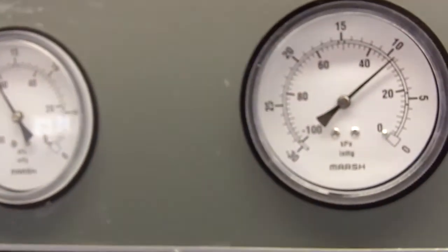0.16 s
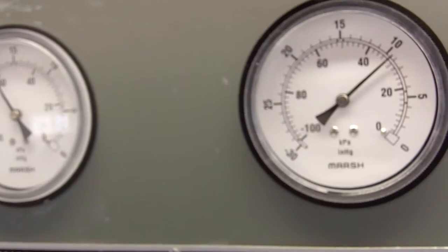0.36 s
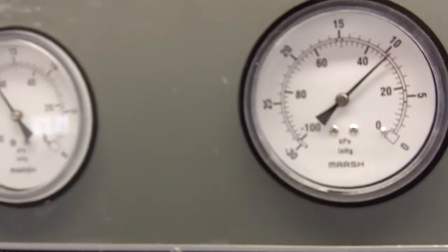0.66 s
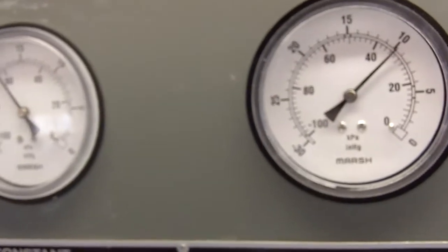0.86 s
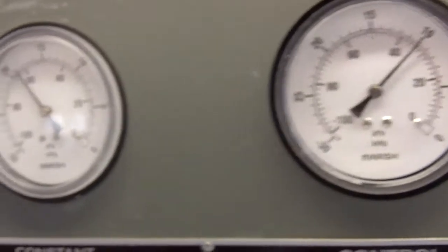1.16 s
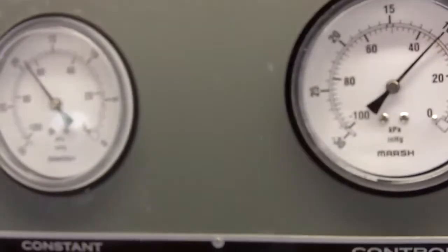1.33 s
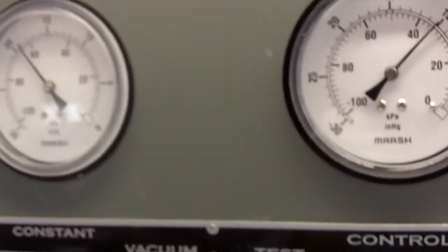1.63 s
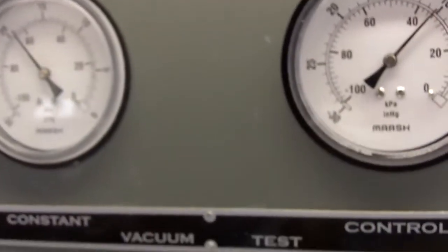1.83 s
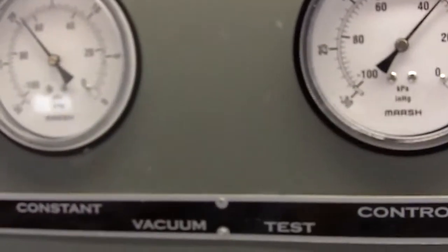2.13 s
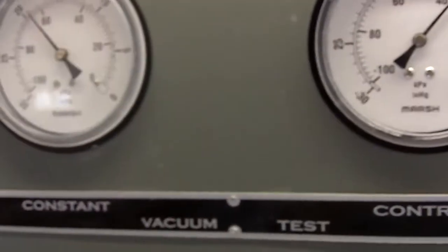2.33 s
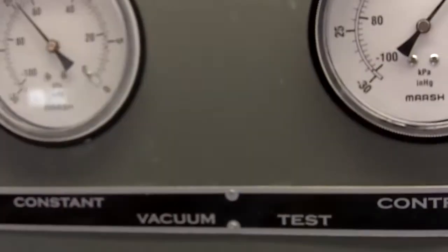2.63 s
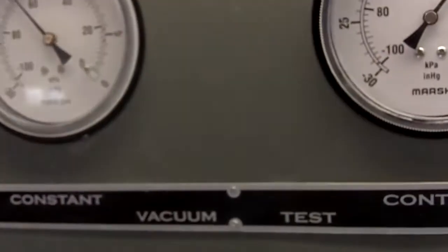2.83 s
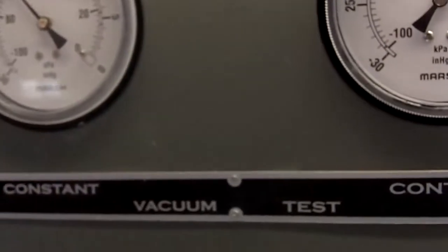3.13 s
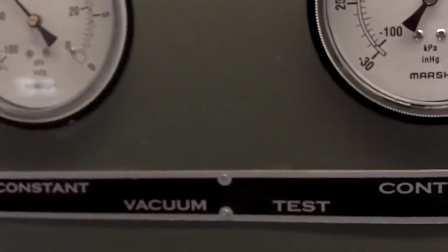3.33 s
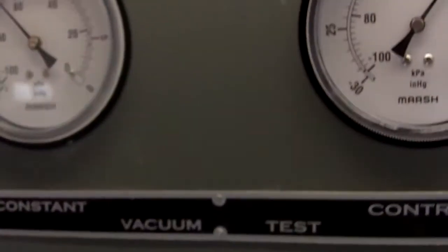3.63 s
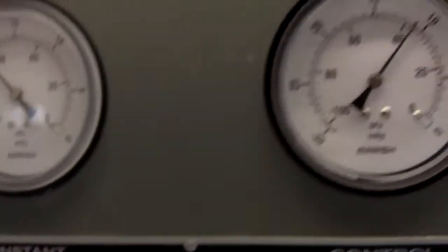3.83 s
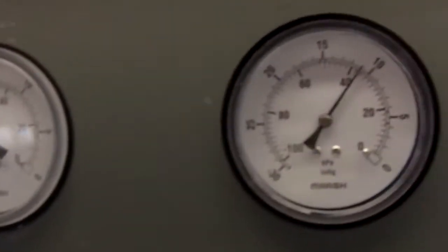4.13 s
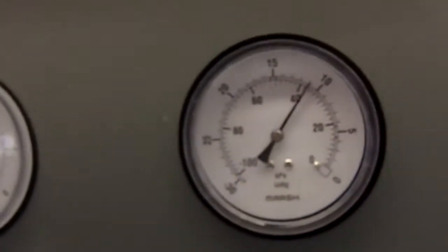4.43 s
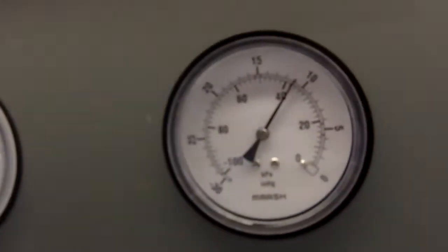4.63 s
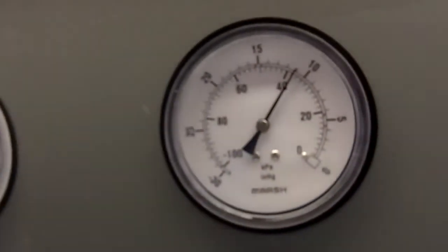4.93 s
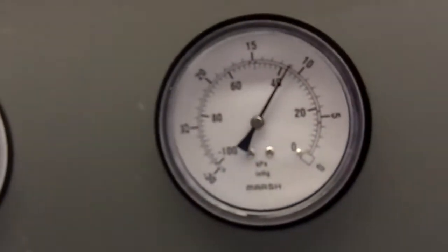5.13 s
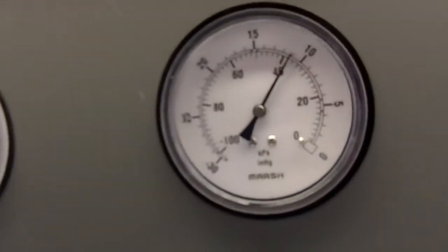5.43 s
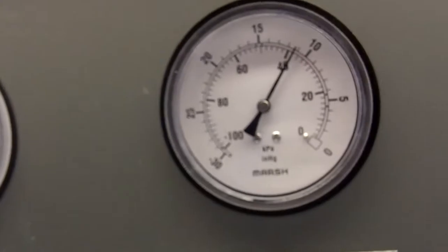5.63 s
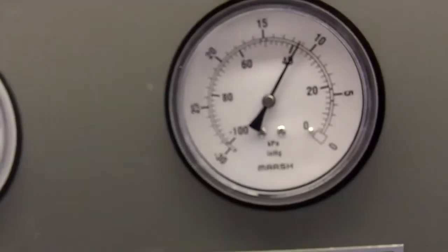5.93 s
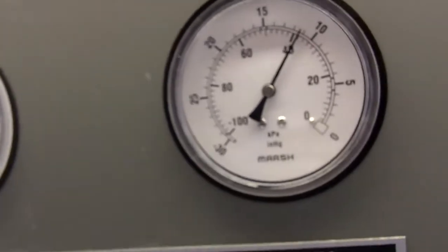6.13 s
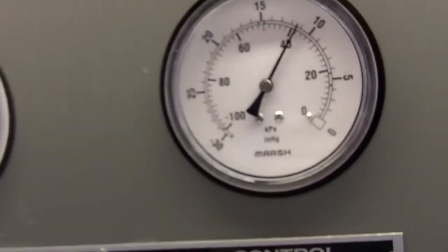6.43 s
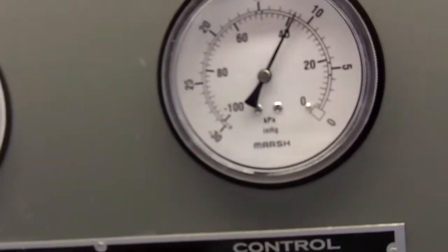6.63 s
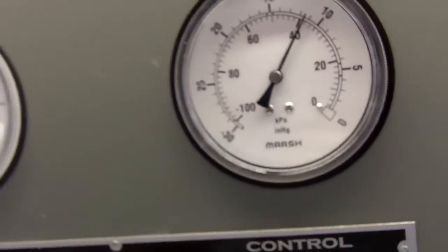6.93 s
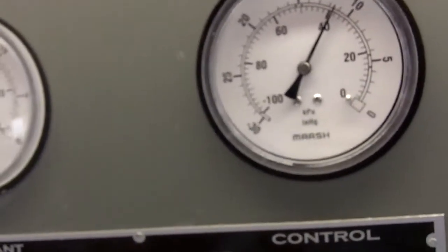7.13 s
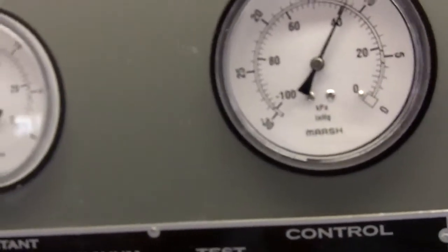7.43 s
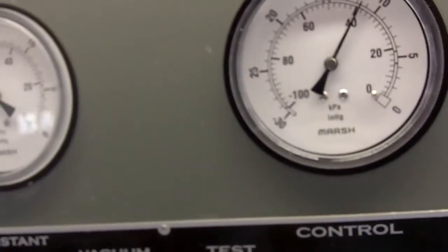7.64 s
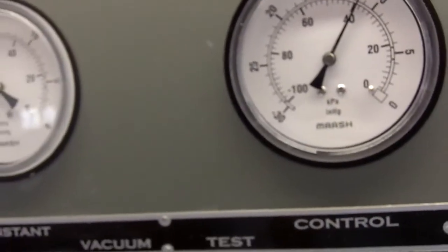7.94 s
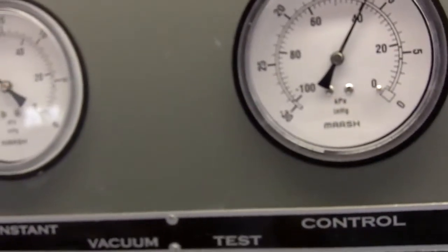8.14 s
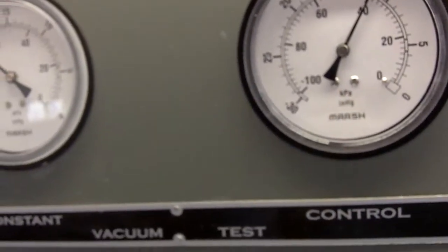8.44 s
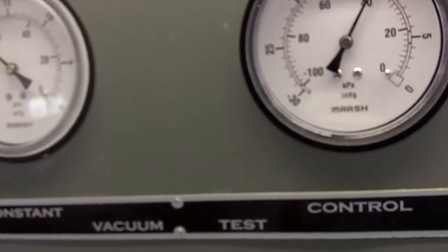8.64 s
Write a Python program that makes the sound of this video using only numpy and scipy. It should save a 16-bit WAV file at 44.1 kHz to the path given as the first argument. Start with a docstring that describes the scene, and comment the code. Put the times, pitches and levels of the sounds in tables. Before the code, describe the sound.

Steady low motor drone and a rapid chugging flutter of about twenty turns a second, boxed in by sheet steel. The pump hunts a little in speed, so its throb rises and falls. After a brief soft brush against the bench, small dry clicks, jarring ticks and muffled knocks become more frequent. Close microphone in a workshop, mono-like, bass heavy with little treble, no start or stop.

```python
"""Under a steel test bench, heard from close to the gauge panel: a belt-driven vacuum pump.
The motor hums at twice the mains frequency; the pump shaft hunts in speed, and its orders throb.
Noise bunched within each turn rings the sheet-steel cabinet: knock, clatter, rattle, valve slaps.
These grow with speed and vacuum. Noise bursts make ticks of a loose fitting, thuds and dry clicks;
short swells of noise make soft scuffs."""
import sys
import numpy as np
from scipy import signal
from scipy.fft import rfft, irfft, next_fast_len
from scipy.io import wavfile
from scipy.ndimage import map_coordinates

SR = 44100
rng = np.random.default_rng(int(sys.argv[2]) if len(sys.argv) > 2 else 0)


def log_audio(samples):
    """Write samples as a 16-bit WAV file to the path given in sys.argv[1]."""
    # one column per channel
    frames = np.atleast_2d(samples).T
    # limit to full scale, then quantise
    limited = np.clip(frames, -1, 1)
    pcm = np.round(limited * 32767).astype(np.int16)
    wavfile.write(sys.argv[1], SR, pcm)


N = 386757

# microphone response, notched in the treble: f/Hz, level/dB
MIC_RESPONSE = [(4700, -0.5), (5600, -13), (6600, -2)]
TOP_HZ = 15100
# microphone hiss: f/Hz, level/dB per Hz
HISS_COLOUR = [(3000, -9), (5600, -5.5), (7000, 0), (8000, 0), (10000, -0.5), (13400, -2), (14200, -20)]

# soft scuffs: t/s, length/s, level/dB
SCUFF_EVENTS = [(2.495, 0.028, -36.5), (2.529, 0.014, -35)]
# scuff noise: f/Hz, level/dB per Hz
SCUFF_COLOUR = [(400, -15), (850, 5.5), (1400, 1.5), (1650, -4.5), (1820, 0), (2050, -19), (2500, -27),
                (3200, -37), (4400, -50), (8500, -52), (13000, -61)]
# light rustling touches, the scuff's first contact among them: t/s, length/s, level/dB
TOUCH_EVENTS = [(1.87, .005, -66), (2.495, 0.0074, -62.5), (2.828, .008, -68), (2.937, .004, -70),
                (3.005, .005, -69), (3.098, 0.0046, -67.5), (3.26, 0.01, -69.5), (6.456, 0.0045, -70),
                (7.736, 0.0054, -68.5), (8.134, .004, -66)]
# touch noise: f/Hz, level/dB per Hz
TOUCH_COLOUR = [(2000, -2.5), (3200, 2), (4100, -0.5), (5000, -7.5), (6000, -14.5), (8500, -17.5),
                (12000, -28.5)]

# ticks of the loose fitting, before lifts: t/s, tick level/dB, level/dB of the heavy stroke that jars the
# cabinet with it
TICK_EVENTS = [(2.9982, -56, -50.5), (4.0103, -59.5, -50), (4.2921, -52.5, -42), (4.4817, -54, -50),
               (4.5602, -60.5, -57), (5.248, -52, -47), (5.342, -45, -38.5), (5.437, -56, -52),
               (5.5194, -59.5, -55), (5.627, -48.5, -46.5), (5.768, -53.5, -51), (6.5341, -56, -50.5),
               (6.63, -54, -49), (6.7266, -54.5, -49), (6.8794, -60, -49.5), (7.0394, -61, -57),
               (7.1521, -48, -40.5), (7.233, -54.5, -50), (7.9189, -50.5, -38), (8.2042, -56, -47.5),
               (8.2811, -59, -54.5), (8.3442, -52, -42), (8.4385, -53.5, -49), (8.5349, -51, -43.5),
               (8.6146, -52.5, -45), (8.6292, -55.5, -50)]
# tick: f/Hz, level/dB per Hz
TICK_COLOUR = [(500, -4), (1500, 8.5), (3000, -3.5), (4500, -8), (6000, -4.5), (7200, -2.5), (8200, -0.5),
               (10000, -8), (12000, -13), (15000, -24.5)]
# cabinet jarred by a heavy pump stroke that lands with a tick: f/Hz, level/dB per Hz
JAR_COLOUR = [(250, -8.5), (450, -2.5), (620, 8.5), (850, 15.5), (1500, 3), (2200, -10), (3200, -20.5),
              (4500, -33), (7000, -48)]
# heavy pump strokes, before lift: t/s, level/dB
THUD_EVENTS = [(1.36, -45), (1.41, -42), (1.46, -45), (1.951, -43), (2.948, -42), (3.114, -39), (3.14, -39),
               (3.16, -41.5), (3.569, -43.5), (3.931, -39.5), (3.975, -41), (4.266, -42.5), (4.84, -43),
               (5.058, -40.5), (5.252, -39), (5.628, -40), (6.125, -40.5), (6.181, -41.5), (6.379, -41),
               (6.602, -38.5), (6.724, -42), (6.912, -42.5), (7.268, -40.5), (7.412, -40), (7.46, -41),
               (7.659, -41.5), (7.725, -43), (7.744, -39), (8.206, -40)]
# dull thud of a heavy stroke: f/Hz, level/dB per Hz
THUD_COLOUR = [(250, -10), (450, 2.5), (620, 9.5), (850, 7.5), (1500, -6.5), (2200, -21), (4000, -49.5)]
# clearest dry clicks, before lift: t/s, level/dB
CLICK_EVENTS = [(1.5654, -55), (2.826, -54), (2.9153, -56), (3.041, -57.5), (5.1547, -59), (6.6907, -56),
                (7.7513, -59), (7.8392, -57.5), (7.8939, -56), (8.1332, -55.5), (8.1728, -56.5),
                (8.2257, -58.5), (8.5599, -57.5)]
# dry click: f/Hz, level/dB per Hz
CLICK_COLOUR = [(1000, -8.5), (4000, -3), (6500, 2), (10000, 2), (14000, -4)]
TICK_LIFT_DB, JAR_LIFT_DB, THUD_LIFT_DB, CLICK_LIFT_DB = 6.0, 13.5, 25, 10.5
# chance clicks: rate at full vacuum, level before lift
CLICKS_PER_S, CHANCE_CLICK_DB, CLICK_SCATTER_DB = 5.4, -62.5, 3.2

# low tone near the hum overtones that swells and fades about once a second
SWELL_HZ, SWELL_DB, SWELL_SWING_DB = 0.98 * 220.4, -40.5, 4.5
SWELL_PERIOD_S, SWELL_PEAK_S = 1.045, 0.93  # period, time of first peak

# sheet-steel cabinet resonances: f/Hz, width/Hz, lift/dB
CABINET_MODES = [(50.7, 5.6, 13), (101, 17, 7.5), (146, 4.9, -0.5), (178, 30, 3.5), (223, 22, 3.5),
                 (284.6, 24, 7), (353, 120, 3), (399, 14, 2), (577.4, 12, 6.5), (639, 60, 7), (760, 49, 3),
                 (853, 24, 6.5), (956, 37, 9.5), (1110.5, 61, 10), (1224, 260, 3), (1450, 18, 6),
                 (1720, 60, 1.5), (2950, 160, 4.5)]
# valve plate flutter: t/s, level/dB
FLUTTER_LEVEL_DB = [(0, -58.5), (2.2, -48.5), (2.8, -45), (3.9, -46), (4.7, -54), (8.77, -50.5)]
# flutter noise: f/Hz, level/dB per Hz
FLUTTER_COLOUR = [(800, -36), (1060, -6.5), (1150, -3), (1230, 3.5), (1290, -8), (1700, -47)]
# valve slaps: delay/turns after the stroke, level/dB
SLAP_TIMING = [(0.02, -0.5), (0.58, -2.5)]
# slap noise: f/Hz, level/dB per Hz
SLAP_COLOUR = [(200, -30.5), (400, -6.5), (520, -1), (690, 2.5), (800, -2.5), (1000, -14.5), (1300, -19),
               (2500, -55)]
SLAP_T60_S, SLAP_SCATTER_DB = 0.16, 3
# mechanism noise: f/Hz, level/dB per Hz
KNOCK_COLOUR = [(10, -24), (25, -3.5), (60, -1.5), (150, 0.5), (250, -3), (320, -5.5), (400, -5), (470, -2),
                (600, -11.5), (1200, -69)]
CLATTER_COLOUR = [(200, -38), (400, -6.5), (520, 0), (690, 0), (800, -2), (1000, -12.5), (1300, -23),
                  (2500, -66.5)]
RATTLE_COLOUR = [(700, -27.5), (1050, -7.5), (1350, 0.5), (1600, -1.5), (1950, -7), (2200, -14.5),
                 (2550, -19.5), (3000, -24.5), (3500, -29.5), (4400, -38.5), (5500, -50.5), (8000, -67)]
# effort laws: level at reference speed and full vacuum/dB, slope/dB per turn/s, vacuum gain/dB
KNOCK_EFFORT = (-29.5, 3.6, 5)
CLATTER_EFFORT = (-33, 2.8, 2.3)
RATTLE_EFFORT = (-43.5, 3.0, 0.89)
SLAP_EFFORT = (-36.3, 2.5, 7)
SURGE_DB, SURGE_KNOTS_PER_S = 0.02, 9  # tiny chance swell shared by the four

# loose panel modes excited by each stroke: f/Hz, width/Hz, level/dB
STROKE_MODES_HZ = [(346.2, 46, 4.5), (400, 55, -1), (587.6, 67, -8.5), (644, 220, -10.5)]
STROKE_DB, STROKE_FADE_DB_PER_S = -39.5, 0.56
STROKE_TURN = 0.72  # place of the stroke, turns from the start

# motor hum: t/s, level/dB
HUM_LEVEL_DB = [(0, -23), (.25, -22.5), (.45, -23.5), (.85, -24.5), (1.2, -22.2), (1.5, -23), (1.9, -23),
                (2.1, -25.5), (2.5, -22.5), (2.9, -24.5), (3.4, -23), (4.35, -24), (4.7, -22.5),
                (5.6, -23.5), (6.2, -22), (7.05, -24), (7.6, -22.5), (8.6, -25)]
# hum overtones: multiple of the hum frequency, level/dB re HUM_LEVEL_DB, chance waver/dB
HUM_PARTIALS = [(1, 1, 0), (1.5, -25, 1.5), (2, -25, 2), (3, -20, 3.5), (5, -32, 1.5)]
# hum modulation by pump load: multiple of shaft speed, depth/dB
LOAD_SWING = [(1, -16.5), (3, -28.5), (5, -33)]
# rotor unbalance: multiple of rotor speed, level/dB
ROTOR_TONES = [(1, -35.5), (3, -46.5)]
MAINS_HZ, ROTOR_HZ = 59.9, 29.6

# pump shaft speed: t/s, speed/turns per s
SHAFT_SPEED = [(0, 20.35), (0.2, 20.3), (0.5, 19.95), (0.85, 20.05), (1.1, 20.3), (1.42, 21.0),
               (1.6, 20.85), (1.9, 20.4), (2.35, 20.17), (2.68, 21.05), (3.05, 20.97), (3.42, 20.43),
               (3.87, 21.1), (4.3, 21.06), (4.62, 20.76), (5.1, 21.08), (5.58, 21.13), (5.95, 20.8),
               (6.4, 20.92), (6.68, 21.14), (7.2, 20.9), (7.6, 20.88), (8.1, 21.1), (8.77, 20.95)]
REFERENCE_TURNS_PER_S = 21
VACUUM_TIME_CONSTANT_S = 3.0
# pump tones: multiple of shaft speed, start level/dB, full-vacuum level/dB
PUMP_TONES = [(1.01, -49.5, -48), (2, -38, -36.5), (3.97, -47, -46), (4.987, -38.5, -41), (7, -39.5, -52.5),
              (9.01, -44.5, -44.5), (11.03, -49, -47.5), (13.05, -48.5, -42.5), (17, -46.5, -42),
              (18.08, -40, -43.5), (19, -42, -40.5), (20, -44.5, -45.5), (20.77, -45, -47.5),
              (28.07, -49, -47.5)]
# throb (third shaft order), before trim and floor: t/s, level/dB
THROB_LEVEL_DB = [(0.0, -43), (0.05, -39.5), (0.54, -24), (1.32, -32), (1.41, -26), (1.59, -19.5),
                  (1.76, -35.5), (2.2, -27), (2.54, -38.5), (2.73, -21.5), (3.22, -21.5), (3.35, -30),
                  (3.62, -30.5), (4.17, -20), (4.47, -21), (4.64, -33), (4.74, -25), (5.71, -22.5),
                  (6.1, -27.5), (6.28, -22.5), (7.13, -21.5), (7.26, -25.5), (7.57, -21), (7.72, -24),
                  (7.85, -21), (8.3, -21.5), (8.7, -21), (8.77, -29)]
THROB_TRIM_DB, THROB_FLOOR_DB = -2.5, -36
# panel that sings when this shaft order meets it, less under vacuum
PANEL_ORDER, PANEL_HZ, PANEL_WIDTH_HZ = 14, 287.5, 7
PANEL_DB, PANEL_FADE_DB = -33.5, 13


def amp(db):
    """Decibels to gain."""
    return 10 ** (np.asarray(db) / 20)


def unit(x):
    """Scale to rms 1."""
    return x / np.sqrt(np.mean(x ** 2) + 1e-20)


def clock():
    """Time of each sample in s."""
    return np.arange(N) / SR


def curves(rows):
    """One value per sample for each column after the time."""
    t, *columns = np.transpose(rows)
    return [np.interp(clock(), t, column) for column in columns]


def wobble(knots_per_s):
    """Smooth random curve through normal random knots."""
    knots = rng.standard_normal(int(N * knots_per_s / SR) + 4)
    return map_coordinates(knots, [clock() * knots_per_s])


def filtered(x, response):
    """x times a response of frequency."""
    size = next_fast_len(N + SR // 2)
    spectrum = rfft(x, size) * response(np.fft.rfftfreq(size, 1 / SR))
    return irfft(spectrum, size)[..., :N]


def colour(points, hz):
    """Gain of (f/Hz, level/dB) points on a log frequency axis."""
    f, db = np.transpose(points)
    return amp(np.interp(np.log(hz + 1), np.log(f + 1), db))


def coloured(x, points):
    """x filtered to a tabulated colour."""
    return filtered(x, lambda hz: colour(points, hz))


def bandpass(f, hz, width_hz):
    """Second-order resonance with unit peak gain."""
    damping = 1j * f * width_hz
    return damping / (hz * hz - f * f + damping)


def tones(angle, orders):
    """Steady sines on multiples of a turning angle; levels are rms."""
    return sum(np.sqrt(2) * amp(db) * np.sin(k * angle + rng.uniform(0, 2 * np.pi))
               for k, db in orders)


def vacuum():
    """Share of the final vacuum reached, 0-1, approached exponentially."""
    return 1 - np.exp(-clock() / VACUUM_TIME_CONSTANT_S)


def effort(speed, law):
    """Gain of a noise that grows with shaft speed and vacuum."""
    full_db, speed_db, vacuum_db = law
    return amp(full_db + speed_db * (speed - REFERENCE_TURNS_PER_S) + vacuum_db * (vacuum() - 1))


def hiss(side_db=-2):
    """Faint microphone hiss: shared noise plus noise of opposite sign in the two channels."""
    mid, side = unit(coloured(rng.standard_normal((2, N)), HISS_COLOUR))
    level = amp(-77.0 + 0.7 * wobble(40))
    return level * (mid + amp(side_db) * np.array([side, -side]))


def rubbing(rows, spectrum):
    """Friction as noise of one colour in short Gaussian swells."""
    swells = sum(amp(db) * np.exp(-0.5 * ((clock() - t) / length_s) ** 2)
                 for t, length_s, db in rows)
    return swells * unit(coloured(rng.standard_normal(N), spectrum))


def scuff():
    """Something brushes softly along the bench; lighter touches rustle."""
    return rubbing(SCUFF_EVENTS, SCUFF_COLOUR) + rubbing(TOUCH_EVENTS, TOUCH_COLOUR)


def bursts(rows, t60_s, tail_db, tail_t60_s):
    """Short cracks of decaying noise, each with a weak tail from the room."""
    out = np.zeros(N + SR)
    t = np.arange(SR // 5) / SR
    decay = amp(-60 * t / t60_s) + amp(tail_db - 60 * t / tail_t60_s)
    attack = 1 - np.exp(-t / t60_s * 20)
    for start_s, db in rows:
        first = round(start_s * SR)
        out[first:first + len(t)] += amp(db) * decay * attack * rng.standard_normal(len(t))
    return out[:N]


def ticking():
    """The fitting ticks, some ticks landing with a heavy stroke that jars the cabinet; other heavy strokes
    thud; smaller clicks are dry."""
    tick_rows = [(t, db) for t, db, _ in TICK_EVENTS]
    jar_rows = [(t, db) for t, _, db in TICK_EVENTS]
    chance_times = clock()[rng.random(N) < CLICKS_PER_S * vacuum() / SR]
    chance_db = rng.normal(CHANCE_CLICK_DB, CLICK_SCATTER_DB, len(chance_times))
    click_rows = [*CLICK_EVENTS, *zip(chance_times, chance_db)]
    ticks = coloured(bursts(tick_rows, t60_s=0.025, tail_db=-17, tail_t60_s=0.15), TICK_COLOUR)
    jar = coloured(bursts(jar_rows, t60_s=0.13, tail_db=-15.0, tail_t60_s=0.37), JAR_COLOUR)
    thuds = coloured(bursts(THUD_EVENTS, t60_s=0.053, tail_db=-19.5, tail_t60_s=0.21), THUD_COLOUR)
    clicks = coloured(bursts(click_rows, t60_s=0.002, tail_db=-30.5, tail_t60_s=0.04), CLICK_COLOUR)
    fitting = amp(TICK_LIFT_DB) * ticks + amp(JAR_LIFT_DB) * jar
    return fitting + amp(THUD_LIFT_DB) * thuds + amp(CLICK_LIFT_DB) * clicks


def swelling():
    """A low tone near the hum overtones swells about once a second and grows with the vacuum."""
    swing = np.cos(2 * np.pi * (clock() - SWELL_PEAK_S) / SWELL_PERIOD_S)
    tone = tones(2 * np.pi * SWELL_HZ * clock(), [(1, SWELL_DB)])
    return np.sqrt(vacuum()) * amp(SWELL_SWING_DB * swing) * tone


def cabinet(x, spectrum):
    """Coloured x ringing in the resonances of the sheet-steel cabinet; rms 1."""
    def response(f):
        gain = colour(spectrum, f) + 0j
        for hz, width_hz, db in CABINET_MODES:
            gain *= 1 + (amp(db) - 1) * bandpass(f, hz, width_hz)
        return gain
    return unit(filtered(x, response))


def chatter(shaft, spectrum, swing_db, scatter_db):
    """Noise of vanes and valve, bunched once, twice and six times a turn; rms 1."""
    beat = unit(0.5 * np.cos(shaft) + np.cos(2 * shaft - 1) + 0.5 * np.cos(6 * shaft))
    force = amp(swing_db * beat + scatter_db * wobble(45))
    return cabinet(force * rng.standard_normal(N), spectrum)


def flutter(shaft):
    """The valve plate rings in a narrow band."""
    level = amp(curves(FLUTTER_LEVEL_DB)[0])
    return level * chatter(shaft, FLUTTER_COLOUR, swing_db=6.0, scatter_db=1.5)


def slaps(shaft):
    """Valves slap shut twice a turn with varying force: short noise bursts in the cabinet; rms 1."""
    force = np.zeros(N)
    for delay_turns, db in SLAP_TIMING:
        at = np.flatnonzero(np.diff((shaft / (2 * np.pi) - delay_turns) // 1))
        scatter = np.clip(rng.standard_normal(len(at)), -2, 1)
        force[at] += amp(db + SLAP_SCATTER_DB * scatter)
    decay_per_sample = amp(-60 / (SLAP_T60_S * SR))
    dying = signal.lfilter([1], [1, -decay_per_sample], force)
    return cabinet(dying * rng.standard_normal(N), SLAP_COLOUR)


def strokes(shaft, knocking, jitter_s=0.000071, scatter_db=1.2):
    """One blow a turn rings the loose panel; harder knocking scatters the timing."""
    at = np.flatnonzero(np.diff(shaft // (2 * np.pi)))
    late, size = rng.standard_normal((len(at), 2)).T
    when = at + SR * jitter_s * unit(knocking)[at] * late
    blows = np.bincount(np.clip(when, 0, N - 1).astype(int), amp(scatter_db * size), N)

    def ring(f):
        # squared modes keep the valleys dark; neighbours move in opposite senses
        return sum((-1) ** k * amp(db) * bandpass(f, hz, width_hz) ** 2
                   for k, (hz, width_hz, db) in enumerate(STROKE_MODES_HZ))
    return amp(STROKE_DB - STROKE_FADE_DB_PER_S * clock()) * unit(filtered(blows, ring))


def motor(shaft):
    """Magnetic hum with wavering overtones, swung by the pump load, plus rotor unbalance."""
    turn = 2 * np.pi * clock()
    hum = sum(amp(waver_db * wobble(4)) * tones(2 * MAINS_HZ * turn, [(k, db)])
              for k, db, waver_db in HUM_PARTIALS)
    load = 1 + tones(shaft, LOAD_SWING)
    unbalance = amp(0.78 * wobble(8.3)) * tones(ROTOR_HZ * turn, ROTOR_TONES)
    return amp(curves(HUM_LEVEL_DB)[0]) * hum * load + unbalance


def pump(shaft, speed, knocking, jitter_rad=0.0084, waver_db=0.5, throb_waver_db=0.5,
         panel_waver_db=2.5):
    """Shaft tones; turning grows uneven with the knocking, which blurs the high orders."""
    uneven = shaft + jitter_rad * unit(knocking) * wobble(15)
    body = np.zeros(N)
    for k, start_db, end_db in PUMP_TONES:
        level_db = start_db + (end_db - start_db) * vacuum()
        waver = waver_db * np.sqrt(k) * wobble(4)  # higher orders waver more
        body += amp(level_db + waver) * tones(uneven, [(k, 0)])
    throb_db = np.maximum(THROB_TRIM_DB + curves(THROB_LEVEL_DB)[0], THROB_FLOOR_DB)
    throb = amp(throb_db + throb_waver_db * wobble(25)) * tones(uneven, [(3, 0.0015)])
    detuning = 2 * (PANEL_ORDER * speed - PANEL_HZ) / PANEL_WIDTH_HZ
    panel_db = PANEL_DB - PANEL_FADE_DB * vacuum() + panel_waver_db * wobble(11)
    singing = amp(panel_db) / np.hypot(1, detuning) * tones(uneven, [(PANEL_ORDER, 0)])
    return body + throb + singing


def scene():
    """One shaft angle times the pump sounds, dead centre; speed and vacuum set the noise levels."""
    speed, = curves(SHAFT_SPEED)
    shaft = 2 * np.pi * (np.cumsum(speed) / SR - STROKE_TURN)
    surge = amp(SURGE_DB * wobble(SURGE_KNOTS_PER_S))
    knocking = surge * effort(speed, KNOCK_EFFORT)
    clattering = surge * effort(speed, CLATTER_EFFORT)
    rattling = surge * effort(speed, RATTLE_EFFORT)
    slapping = surge * effort(speed, SLAP_EFFORT)
    # negative swing: loud between the beats
    knock = knocking * chatter(shaft, KNOCK_COLOUR, swing_db=2.0, scatter_db=0.5)
    clatter = clattering * chatter(shaft, CLATTER_COLOUR, swing_db=-1.0, scatter_db=1.63)
    rattle = rattling * chatter(shaft, RATTLE_COLOUR, swing_db=0.05, scatter_db=1.15)
    slap = slapping * slaps(shaft)
    background = hiss() + scuff() + ticking() + swelling()
    mechanism = flutter(shaft) + rattle + slap + clatter + knock + strokes(shaft, knocking)
    return background + mechanism + motor(shaft) + pump(shaft, speed, knocking)


def record(dry):
    """Stereo pickup: treble notch, slightly more bass on the right, band limit, 5 ms end fades."""
    def response(hz):
        lean = amp(np.outer([-0.2, 0.2], 1 / (1 + (hz / 220) ** 4)))
        return colour(MIC_RESPONSE, hz) * lean * (hz < TOP_HZ)
    fade = np.clip(np.minimum(clock(), clock()[::-1]) / 0.005, 0, 1)
    return filtered(dry * fade, response)


dry = scene()
out = record(dry)
log_audio(out)
```